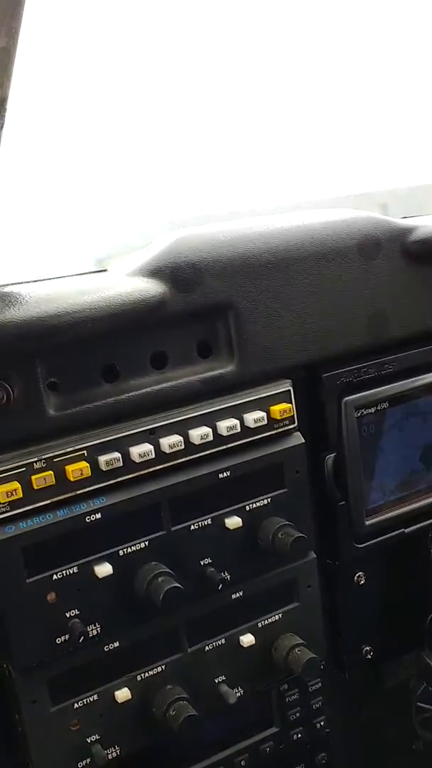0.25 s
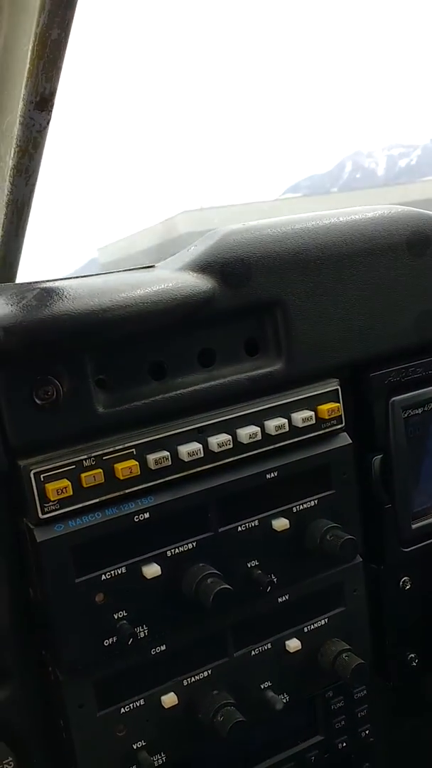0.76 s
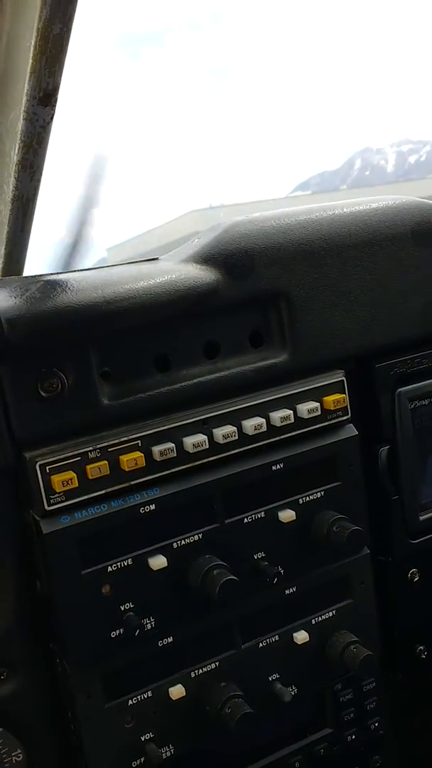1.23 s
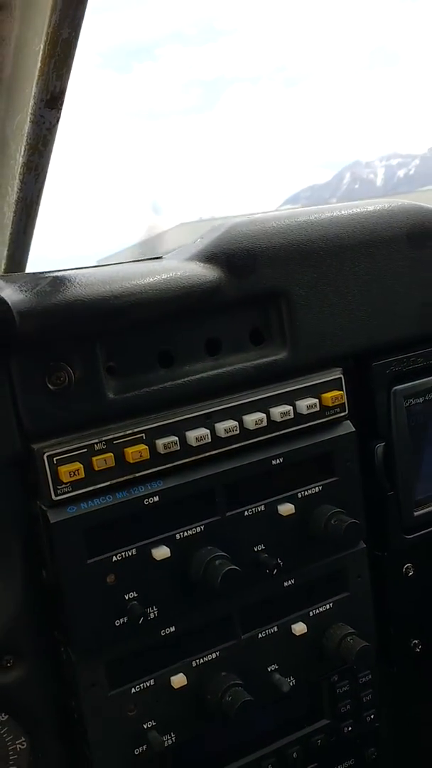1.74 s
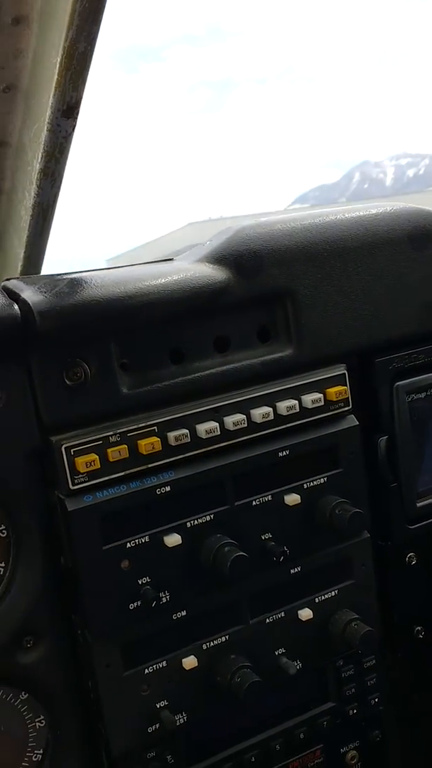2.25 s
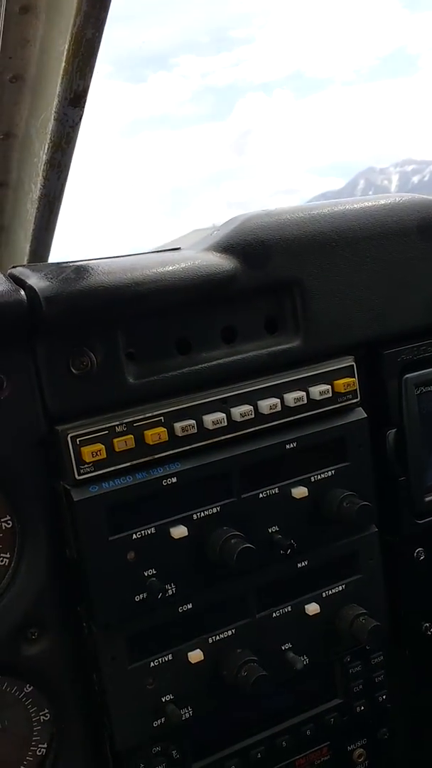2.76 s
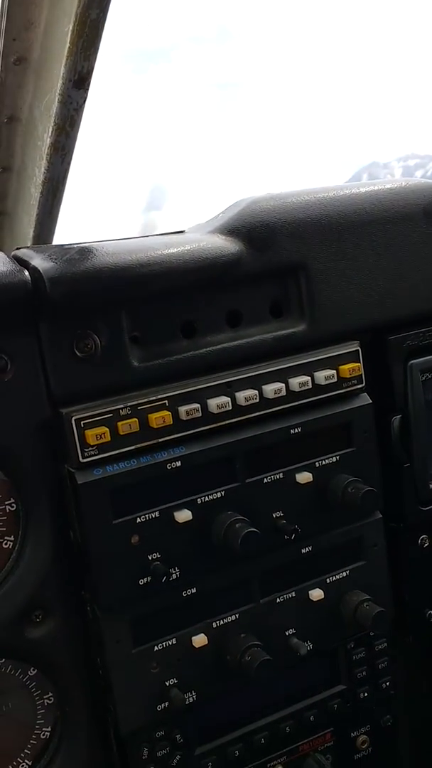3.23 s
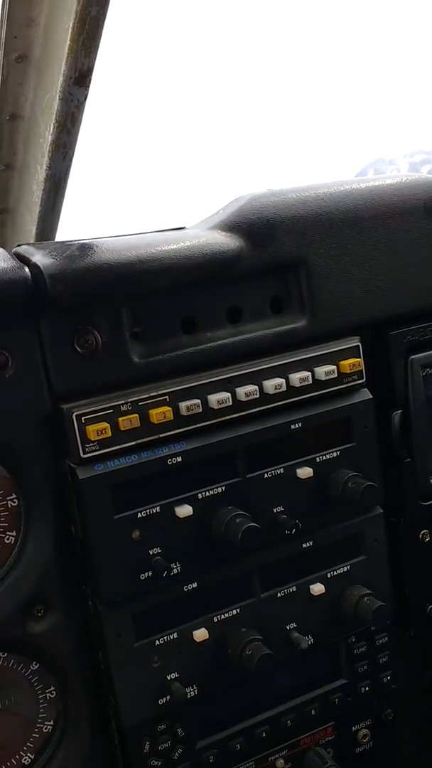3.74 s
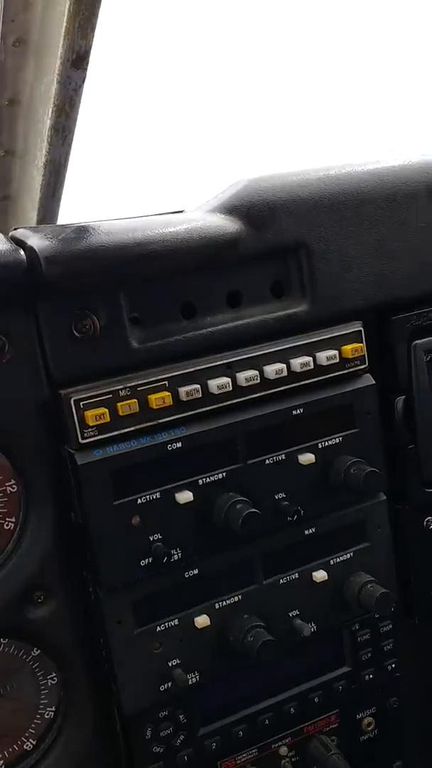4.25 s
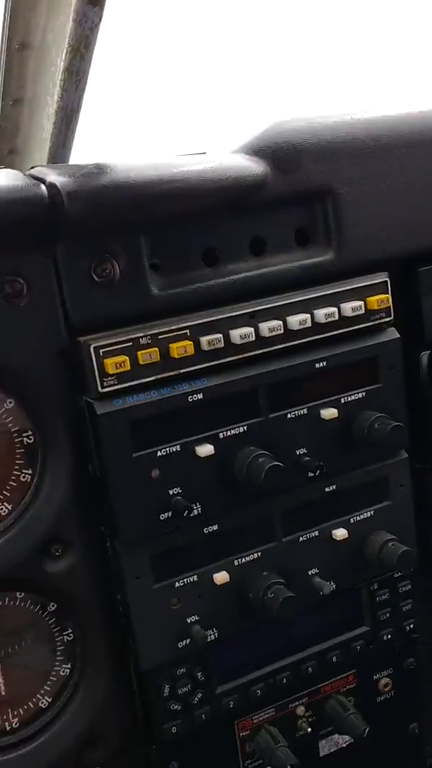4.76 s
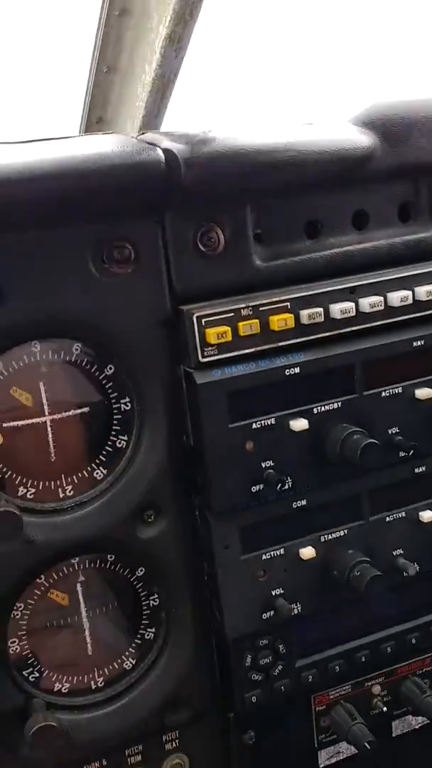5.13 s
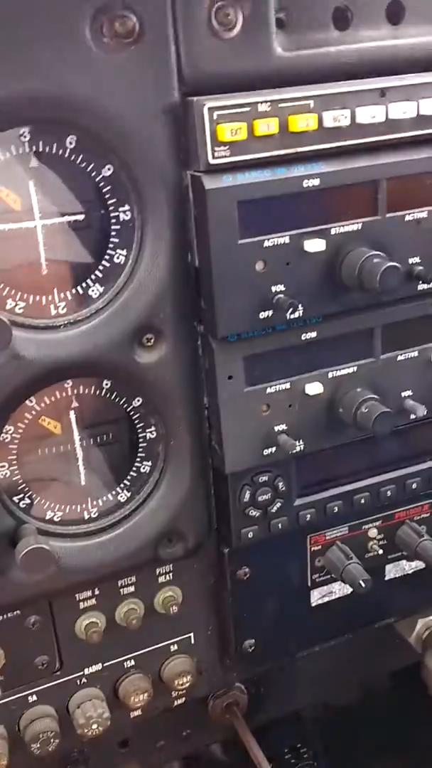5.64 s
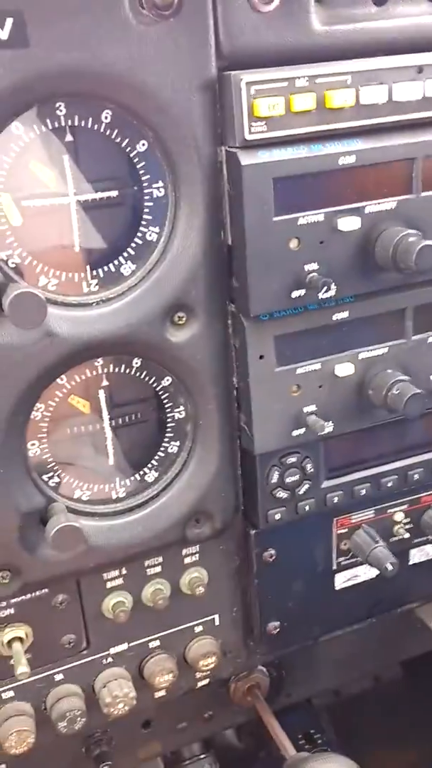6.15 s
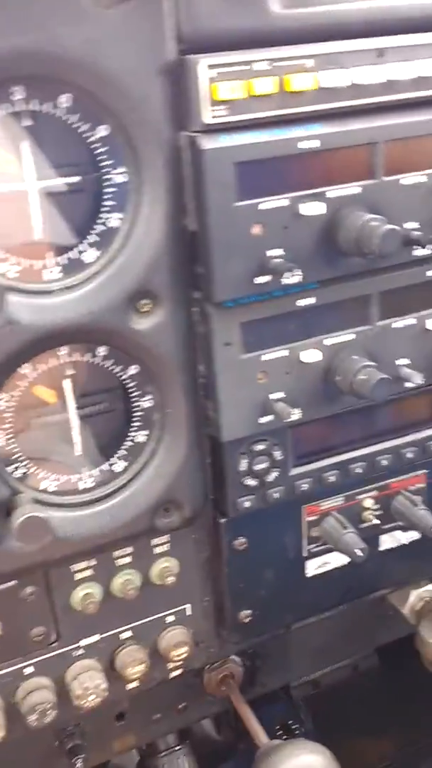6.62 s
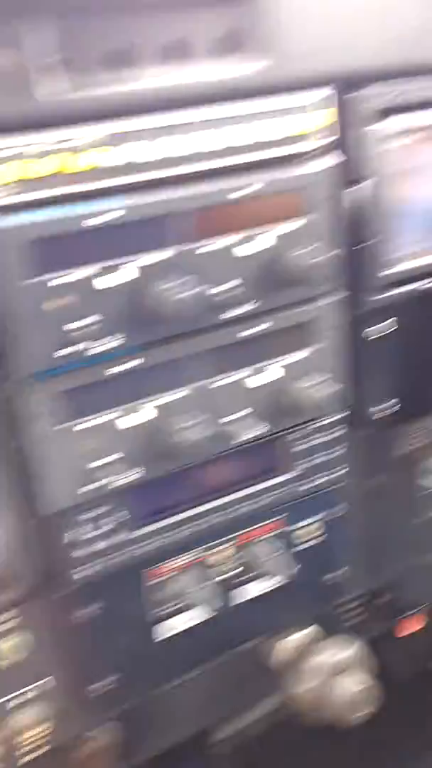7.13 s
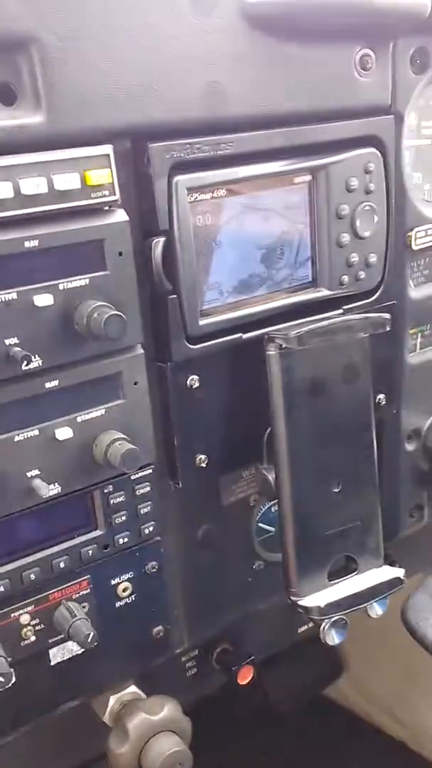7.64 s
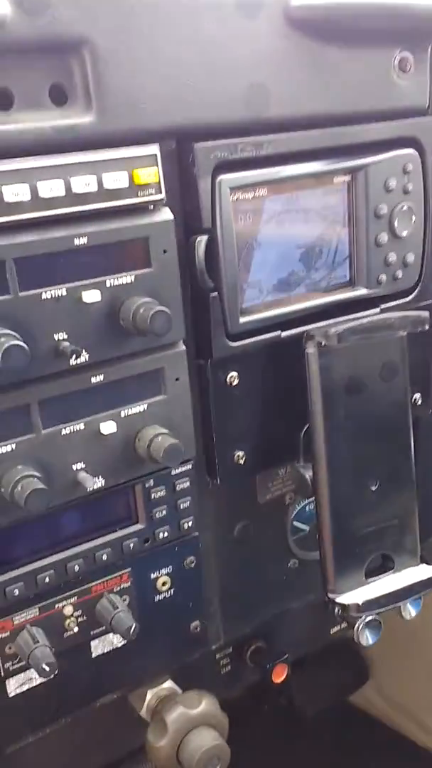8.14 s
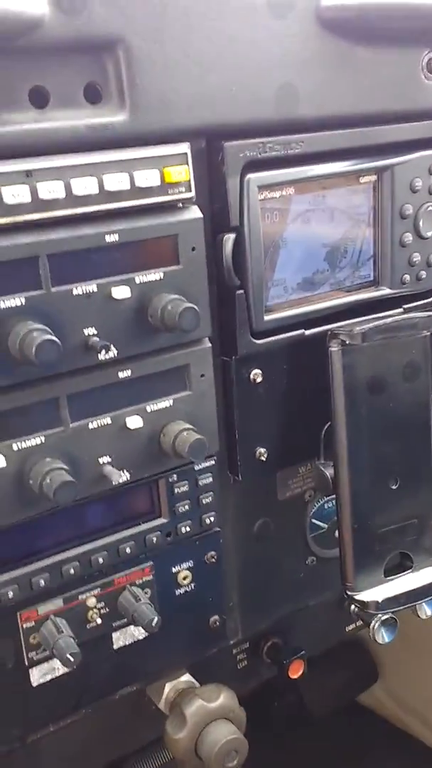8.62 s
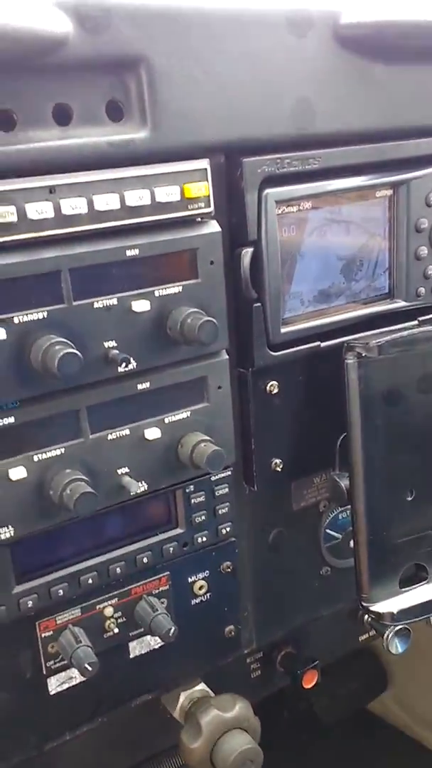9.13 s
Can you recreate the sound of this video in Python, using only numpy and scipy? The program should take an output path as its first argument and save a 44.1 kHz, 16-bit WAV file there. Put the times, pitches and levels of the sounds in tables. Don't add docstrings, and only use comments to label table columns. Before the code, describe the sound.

A piston propeller engine idles steadily, heard from inside a small cockpit. Low throbbing drone and broad air roar stay constant, while loose panels knock and rattle rapidly in the engine rhythm. A thin high gyro whine slowly climbs, joined by a faint fan tone later. A hand-held microphone moves about, adding light rubbing, dry ticks and scattered clicks, the sharpest about three quarters through.

```python
import sys
import numpy as np
from scipy import signal
from scipy.fft import rfft, irfft
from scipy.io import wavfile
from scipy.ndimage import uniform_filter1d

SR = 44100
rng = np.random.default_rng(int(sys.argv[2]) if len(sys.argv) > 2 else 0)


def gain_from_db(level_db):
    decades = np.asarray(level_db, float) / 20
    return 10 ** decades


def master_out(mix):
    frames = np.transpose(np.atleast_2d(mix))
    ceiling = np.clip(frames, -1, 1)
    pcm = np.round(ceiling * 32767).astype(np.int16)
    wavfile.write(sys.argv[1], SR, pcm)


N = 413658
COARSE = 6
WIDENER_LAG_S = .000562

# (t/s, lowered, leaning left)
PLACE = [(0, -7, 2), (.5, -5.5, -2.3), (.8, -7.5, -0.5), (1.4, -4.5, -3), (1.9, -3.5, -2), (2.5, -5, -4),
         (2.95, -4, 0.5), (3.25, -5, -0.5), (3.9, -4, 0.5), (4.6, 0, 0.5), (5.2, -1.5, 3), (5.65, 1, 4.5),
         (6.1, 2.5, 1), (6.5, 3, 2), (7, 2, 5.5), (7.5, 2, -1.5), (8.2, 2, 0), (9.38, 2.5, -0.5)]


def rms_one(x):
    return x / np.sqrt(np.mean(x ** 2) + 1e-20)


def in_time(rows, step=1):
    s, *columns = np.transpose(rows)
    return [np.interp(np.arange(0, N, step) / SR, s, c) for c in columns]


def at_hz(points, column=1):
    hz = np.arange(N // 2 + 1) * SR / N + 1
    points = np.array(points)
    return np.interp(np.log(hz), np.log(points[:, 0]), points[:, column])


def drift(rate, step=1):
    r = np.exp(-80 * np.pi * rate / SR)
    slow = signal.lfilter([1], [1, -2 * r, r * r], rng.standard_normal(N // 40 + 4002))[4000:]
    return np.interp(np.arange(0, N, step) / 40, np.arange(len(slow)), rms_one(slow - slow.mean()))


def resonate(x, hz, width_hz, step=1):
    r = np.exp(-np.pi * width_hz * step / SR)
    poles = [1, -2 * r * np.cos(2 * np.pi * hz * step / SR), r * r]
    return signal.lfilter([(1 - r * r) / 2, 0, (r * r - 1) / 2], poles, x + 1e-18)


def noise(spectrum):
    return irfft(rfft(rng.standard_normal(N)) * gain_from_db(at_hz(spectrum)) * np.sqrt(SR / 2), N)


def engine_cycles():
    # (t/s, cycle rate/Hz)
    speed = [(0, 10.40), (.4, 10.481), (.9, 10.408), (1.4, 10.422), (2, 10.411), (2.5, 10.382),
             (3.1, 10.417), (3.7, 10.336), (4.1, 10.343), (4.9, 10.289), (5.6, 10.28), (6.05, 10.24),
             (6.3, 10.319), (6.6, 10.242), (7.1, 10.366), (7.6, 10.237), (8.8, 10.248), (9.38, 10.36)]
    return .076 + np.cumsum(in_time(speed)[0]) / SR


def drone(cycles):
    # (multiple of cycle rate, left level/dB, right level/dB, right
    lines = [(3, -69, -68, 0.1), (4, -54, -54, 0.9), (6, -38.3, -35.5, 0.4), (7, -52, -54, 0.5),
             (8, -50, -51, 0.6), (9, -51, -52, -0.3), (10, -49, -53, 0.6), (12, -40, -34, 1.2),
             (13, -43, -39, 0.5), (14, -47, -45, 0.8), (15, -43, -42, 0.9), (16, -37, -37, 0.2),
             (18, -44, -40, -0.1), (20, -36.5, -32.5, -0.5), (22, -58, -47, 2.0), (23, -52, -52, -1.8),
             (24, -38, -42, -1.4), (26, -70, -50, -2.9), (28, -46, -40, -1.1), (30, -60, -47, 1.6),
             (32, -43, -50, -1.6), (36, -46, -50, 2.6),
             (11, -49, -49, 1), (38, -53, -46, 1.3), (40, -46, -48, -1), (44, -46, -49, -.6),
                    (48, -51, -46, -.8), (54, -47, -50, .3), (58, -47, -50, .5), (60, -44, -46, .5)]
    # (t/s, 0 long to 1 short)
    blade_path = [(0, 0), (.6, .2), (1.1, -.2), (1.6, 1), (2.3, 1.4), (2.9, .95), (3.4, 1.1), (3.9, -.2),
                  (4.6, .25), (5.6, -.4), (5.95, 1.1), (6.4, .8), (6.7, -.4), (7.25, -.7), (7.7, .9),
                  (8.5, 0), (9, .6), (9.38, .3)]
    windscreen_lines = [12, 28, 58, 60]
    cancel_db = {12: 10, 20: 6, 48: -9}
    reflected = [14, 28, 32, 48, 58]
    strong_firing, path_lead_cycles, far_lag_cycles = .22, .016, .0048
    odd_lead_rad, windscreen_db_per_step = 1, .9

    out = np.zeros((2, len(cycles)))
    path, = in_time(blade_path, COARSE)
    lowered, _ = in_time(PLACE, COARSE)
    for k, left_db, right_db, lead in lines:
        blade = k % 4 == 0 and 12 < k < 44
        lead_cycles = blade * path_lead_cycles * path - far_lag_cycles * (k > 30)
        angle = 2 * np.pi * k * (cycles - strong_firing + lead_cycles)
        angle += np.pi * (k not in reflected) + odd_lead_rad * (k % 2)
        angle += .007 * min(k, 24) * drift(1.5, COARSE)
        loss_db = (k in windscreen_lines) * windscreen_db_per_step * (lowered + 1)
        loss_db = loss_db + cancel_db.get(k, 0) * np.clip(path, 0, 1)
        waver = gain_from_db(1.9 + .6 * drift(1.8, COARSE) - loss_db)
        out[0] += gain_from_db(left_db) * waver * np.cos(angle - lead / 2)
        out[1] += gain_from_db(right_db) * waver * np.cos(angle + lead / 2)
    return signal.resample(out, N, axis=1)


def panels(cycles):
    # (share of the cycle, level/dB in each of four panel groups)
    contacts = [(0.02, 10, 1, 8, 0), (0.09, 10.5, 6.5, -8, 5.5), (0.17, 9, 5.5, -15, 14),
                (0.23, 3.0, -0.0, 9.5, -6), (0.28, -3, -4, -10, -3), (0.43, 8, 4.5, -5, -10.0),
                (0.5, 3.5, -4.5, -7.0, -2), (0.56, -0.5, 7, 2, 10), (0.62, 2.5, 3.5, 6.5, 0),
                (0.67, -5, 2, 1.5, 0.0), (0.73, -3, 9, 9, 8), (0.77, 3.0, 6.5, 13.5, -1),
                (0.86, -4, 9.5, 6, -8), (0.92, -20, 6, -9, -10)]
    low_left_db = [(6, -2, 6, -5), (2, 4, 2, 6), (1, 1.5, 1.0, 16), (3, 8, 8, -5), (1.5, 2.0, 4.5, 1.5),
                   (-1.0, -19, -11, -6), (2.5, -23, -10.0, 5), (7.0, 5, 11, 5), (0.5, 2, 4, -0.5),
                   (4, 4.5, 6.5, 12), (-5, 10, 6.5, 0.5), (0, 4, 12.5, 8), (-10.0, -9, -1.5, -5),
                   (5, -4, -18, -6)]
    low_right_db = [(-7, 2, 13, -3), (-9, 7, -5, 2), (11.5, 0, -9, 18), (-2, -14, 10, 6), (-2, 1, 4.0, 6),
                    (14, 14, -8.0, -16), (2, -7, 3, 2), (-3.5, -5.5, 6, 6.0), (4.5, 5.5, -7, 11),
                    (-5.5, -1, -2, 12), (-1, 1.5, 14, 5.0), (6, 8.5, 9.0, 5), (2, 7, 8.5, 3.0),
                    (-15, 5, -10.0, -8)]
    # (f/Hz, width/Hz, high level/dB, low left level/dB, low right level/dB)
    modes = [(354, 104, -8.5, -28, -2), (440, 24.6, -2, 5, 2), (501.5, 22, -5, 4.5, -6),
             (598.4, 23, 0, 8, 4), (625, 39, 0.5, 2, 4.5), (679, 34.5, -1, 5.5, 6.5), (784, 84, 1, 6, 3.5),
             (868, 73, 2.5, -2.5, -1), (935.5, 34, 5.5, 9, 6.5), (1044, 71, -50, -4.5, 0.5),
             (1123, 56, 0, -2, -40), (1140, 160, -16, -1, -14), (1223, 53.4, 2.5, 6, 2),
             (1405, 96, -3, 2.5, -3.5), (1457, 89, -3, 0, -2.5), (1550, 180, -23, -4, -8),
             (1790, 29, -2, 0, -8), (2060, 120, -17, -25, -35)]
    group_edges_hz = [730, 1100, 1300]
    pose_s = [
        2.0,
        5.6,
        7.0,
        7.5,
    ]
    # (t/s, level/dB)
    hard_knocks = [(1.886, 10), (2.753, 10), (3.118, 11), (3.909, 9), (4.523, 10), (5.465, 7.5),
                   (5.66, 8.5), (6.462, 5), (7.299, 9.5), (7.829, 12.5), (8.078, 10)]
    knock_db, shake_db, habit_db = -29, -2.5, 1.5
    uneven_db = 1.4

    share, *force_db = np.transpose(contacts)
    count, turns = len(share), int(cycles[-1] + 1)
    turn = np.arange(turns)
    due = turn[:, None] + share + .0004 * rng.standard_normal((turns, count))
    at = np.minimum(np.searchsorted(cycles, due.ravel()), len(cycles) - 1)
    turn_s = np.searchsorted(cycles, turn) * COARSE / SR
    blow_db = uneven_db * rng.standard_normal(at.shape)
    hard_s, hard_db = np.transpose(hard_knocks)
    hard_at = (hard_s * SR / COARSE).astype(int)
    coarse_s = np.arange(0, N, COARSE) / SR
    push = rng.choice([-1, 1], count)
    knock, shake = 0, 0
    for hz, width_hz, high_db, left_db, right_db in modes:
        push = -push
        heard_db = np.interp(coarse_s, pose_s, [high_db, left_db, left_db, right_db])
        heard = gain_from_db(heard_db) * np.sqrt(width_hz)
        group = np.searchsorted(group_edges_hz, hz)
        felt_db = [np.interp(turn_s, pose_s, [high, left[group], left[group], right[group]])
                   for high, left, right in zip(force_db[group], low_left_db, low_right_db)]
        habit = gain_from_db(np.transpose(felt_db) + habit_db * rng.standard_normal(count)) * push
        path_rad = rng.uniform(-.6, .6, count) + rng.normal(0, .008, count) * turn[:, None]
        habit = habit * np.cos(path_rad)
        hits = np.zeros(len(cycles))
        hits[at] = (habit * gain_from_db(1.5 * rng.standard_normal(due.shape))).ravel() * gain_from_db(blow_db)
        hits[hard_at] = push[0] * gain_from_db(hard_db)
        hits = np.roll(hits, rng.integers(0, 5))
        wash = rng.standard_normal(len(cycles))
        ring = resonate(hits, hz, width_hz, COARSE)
        knock = knock + heard * rms_one(resonate(ring, hz, 3.25 * width_hz, COARSE))
        sway = resonate(wash, hz, 1.3 * width_hz, COARSE)
        shake = shake + heard * rms_one(resonate(sway, hz, 3.1 * width_hz, COARSE))
    knock = gain_from_db(knock_db) * signal.resample(rms_one(knock), N)
    shake = gain_from_db(knock_db + shake_db) * signal.resample(rms_one(shake), N)
    return knock, shake


def airframe(cycles):
    # (f/Hz, level/dB per Hz)
    roar_spectrum = [(25, -79), (42, -69), (66, -62.5), (105, -59), (140, -52), (220, -61.5), (330, -57.5),
                     (1000, -63.5), (1640, -70.5), (2200, -69), (2600, -79), (3700, -80.5), (5600, -87),
                     (6500, -98.5)]
    # (f/Hz, level/dB per Hz)
    hiss_spectrum = [(1500, -100), (5000, -92), (7500, -98), (8500, -100.5), (12000, -109.5), (15500, -100)]
    draught_db_per_step = 0.43

    knock, shake = panels(cycles[::COARSE])
    shaft_db = 0.13 * np.cos(4 * np.pi * (cycles - .2))
    blade_db = 0.31 * np.cos(8 * np.pi * (cycles - .1))
    throb = gain_from_db(shaft_db + blade_db + 0.96 * drift(9.3))
    roar = noise(roar_spectrum)
    _, left = in_time(PLACE)
    upper = signal.sosfilt(signal.butter(2, 2500, "high", fs=SR, output="sos"), roar)
    roar += (gain_from_db(draught_db_per_step * (left - left.mean())) - 1) * upper
    return knock + throb * (shake + roar) + noise(hiss_spectrum) * gain_from_db(2.0 * drift(30))


def gyro():
    # (t/s, level/dB)
    heard_db = [(0, -66), (1.8, -67), (2.2, -61), (3.1, -66), (3.8, -58), (4.6, -60), (5.45, -67),
                (5.6, -57), (6.6, -52), (7.1, -59), (7.8, -56), (8.6, -62), (9.38, -61)]
    # (t/s, peak level/dB)
    fan_faced = [
        (5.2, -55),
        (7.2, -58),
        (7.9, -57),
    ]
    start_hz, gain_hz_per_s, slowing_hz_per_s2 = 3289, 60, .27
    octave_from_s, octave_start_db, octave_gain_db_per_s = 5.1, -72, 1.5
    fan_hz, fan_fade_db_per_s, fan_away_db = 4269, 15, -79

    t = np.arange(N) / SR
    hz = start_hz + gain_hz_per_s * t - slowing_hz_per_s2 * t ** 2
    angle = 2 * np.pi * np.cumsum(hz + 1.5 * drift(25)) / SR
    whine = gain_from_db(in_time(heard_db)[0] + 3 + 1.8 * drift(5)) * np.sin(angle)
    octave_db = octave_start_db + octave_gain_db_per_s * (t - octave_from_s) - 2 * (t < octave_from_s)
    octave = gain_from_db(octave_db + 3 + 2.2 * drift(5)) * np.sin(2 * angle)
    fan_db = np.max([db - fan_fade_db_per_s * abs(t - s) for s, db in fan_faced], axis=0)
    fan_angle = 2 * np.pi * np.cumsum(fan_hz + 1.0 * drift(9.1)) / SR
    fan = gain_from_db(np.maximum(fan_db, fan_away_db) + 2.4 * drift(4)) * np.sin(fan_angle)
    return whine + octave + fan


def hand():
    # (start t/s, length/s, level/dB)
    rubs = [(0.398, 0.28, -58), (0.848, 0.042, -56), (0.936, 0.081, -53), (1.397, 0.12, -62),
            (1.82, 0.042, -59), (2.113, 0.036, -59), (2.303, 0.035, -54), (2.43, 0.13, -58),
            (2.72, 0.11, -62), (3.704, 0.056, -62), (3.809, 0.064, -67), (3.95, 0.065, -58),
            (4.162, 0.048, -59), (4.877, 0.079, -57), (5.39, 0.045, -56), (5.605, 0.29, -58),
            (5.901, 0.085, -51), (6.07, 0.11, -51), (6.42, 0.1, -56), (6.748, 0.14, -54),
            (6.929, 0.073, -63), (7.282, 0.29, -64), (7.657, 0.11, -59), (7.758, 0.094, -52),
            (7.98, 0.11, -59), (8.297, 0.076, -55), (8.474, 0.067, -48), (8.564, 0.17, -52.5),
            (9.167, 0.075, -62), (9.28, 0.084, -60)]
    # (t/s, peak level/dB, ring f/Hz)
    clicks = [(0.471, -26, 4220), (0.5595, -32, 7660), (0.6243, -33, 4140), (0.941, -24.5, 3170),
              (1.322, -51, 4240), (3.4261, -40, 4310), (3.8505, -27, 3300), (3.983, -28, 4500),
              (4.3994, -38, 4100), (4.8244, -41, 4200), (6.2456, -31, 3920), (6.282, -44, 4400),
              (7.172, -17, 6200), (7.1775, -22, 4720), (7.1825, -32, 3600)]
    grip_db, rub_edge_s = -57.5, 0.036
    grains_per_s, slips_per_s = 1200, 60
    slip_hz, slip_width_hz, slip_db = 7350, 350, -8

    t = np.arange(N) / SR
    pressure = gain_from_db(grip_db)
    for s, length, db in rubs:
        inside_s = np.minimum(t - s, s + length - t)
        pressure = pressure + gain_from_db(db) * np.clip(inside_s / rub_edge_s + .5, 0, 1)
    grain_size = gain_from_db(2.8 * np.minimum(rng.exponential(1, N), 5)) * rng.choice([-1, 1], N)
    grains = (rng.random(N) < grains_per_s / SR) * grain_size
    rub = 1.2 * resonate(grains, 5700, 507) + 0.77 * resonate(grains, 7600, 7000)
    rub += 2.0 * resonate(grains, 5400, 620)
    slips = (rng.random(N) < slips_per_s / SR) * gain_from_db(2 * rng.standard_normal(N))
    slip_ring = rms_one(resonate(slips, slip_hz, slip_width_hz))
    out = pressure * (rms_one(rub) + gain_from_db(slip_db) * slip_ring)
    for s, peak_db, hz in clicks:
        strike = 0.064 * rng.standard_normal(441) * np.exp(-np.arange(441) / 130)
        strike[0] = 1
        click = resonate(strike, hz, 920) + 0.054 * resonate(strike, 10000, 9000)
        click += 0.48 * resonate(strike, 3400, 2000)
        start = round((s + 0.0013) * SR)
        out[start:start + 441] += gain_from_db(peak_db + 3.5) * click / np.abs(click).max()
    return out


def ticks():
    # (t/s, peak level/dB)
    snaps = [(0.5606, -38), (0.8694, -43), (0.9408, -36), (1.9734, -41), (2.1186, -44), (2.4573, -45),
             (3.8506, -46), (5.4046, -46), (6.765, -41), (6.7974, -43), (6.8399, -46), (6.8623, -45),
             (7.1716, -41), (7.7338, -36), (8.0287, -42), (8.5265, -43), (8.6697, -47), (0.6444, -46),
             (1.4486, -43), (4.9182, -46), (7.1755, -43), (7.6106, -39), (7.6894, -44), (8.4781, -39),
             (8.5689, -42), (8.776, -47)]
    out = np.zeros(N + 88)
    for s, peak_db in snaps:
        snap = rng.standard_normal(88) * np.exp(-np.arange(88) / 25)
        out[round(s * SR):][:88] += gain_from_db(peak_db + 7.0) * np.diff(snap, prepend=0) / 2
    return out[:N]


def widen(shared, own):
    # (f/Hz, likeness 0-1, left minus right/dB)
    width = [(60, 0.5, 3), (150, 0.72, 1.5), (240, 0.25, -0.5), (375, 0.18, 2), (470, 0.72, 0),
             (637, 0.65, 1.5), (620, 0.97, 5), (760, 1, -1.5), (1140, 1, 1.5), (1520, 0.67, -5),
             (1770, 1, 0), (3000, 0.7, 0)]
    low_lead_rad = .5

    alike = np.clip(at_hz(width), 0, 1)
    balance_db = at_hz(width, column=2)
    alike = np.maximum(alike, at_hz([(1800, 0), (2600, 1)])) * at_hz([(2600, .95), (5000, .9), (9000, .7)])
    hz = np.arange(N // 2 + 1) * SR / N
    lead = np.maximum(low_lead_rad, 2 * np.pi * hz * WIDENER_LAG_S - np.pi)
    a = np.sqrt((1 + alike) / 2) * rfft(shared)
    b = np.sqrt((1 - alike) / 2) * rfft(own)
    left = (a + b) * gain_from_db(balance_db / 2)
    right = (a - b) * gain_from_db(-balance_db / 2) * np.exp(1j * lead)
    return irfft([left, right], N)


def standing_waves(x):
    edges_hz = [100, 145, 187, 228, 270, 310, 350, 470, 540, 700, 1000, 1300, 1600]
    # (level/dB per step lowered, level/dB per step left)
    slopes = [(-0.2, 0.22), (-0.49, 0.73), (-0.3, 0.94), (-0.28, -0.031), (0.11, -0.36), (0.053, 0.52),
              (0.098, 0.15), (-0.22, -0.59), (-0.58, -0.18), (-0.11, -0.11), (0.044, 0.095), (-0.64, -0.7)]

    lowered, left = in_time(PLACE, COARSE)
    spectrum, change = rfft(x) / COARSE, 0
    for low, high, (down_db, left_db) in zip(edges_hz, edges_hz[1:], slopes):
        mask = at_hz([(low / 1.04, 0), (low * 1.04, 1), (high / 1.04, 1), (high * 1.04, 0)])
        level_db = down_db * (lowered - lowered.mean()) + left_db * (left - left.mean())
        change = change + (gain_from_db(level_db) - 1) * irfft(spectrum * mask, N // COARSE)
    return x + signal.resample(change, N, axis=1)


def holes(x):
    top_band_hz, hole_share, hole_chance, hole_wider = 15250, .026, .9, 1.8

    def band(spectrum, low, high):
        return irfft(spectrum * at_hz([(low, 0), (low + 20, 1), (high, 1), (high + 20, 0)]), N)

    def gate(threshold):
        blocks = drift(22, 512).repeat(512)[:N]
        return uniform_filter1d(1. * (blocks < threshold), 300)

    out = x - gate(-.4) * band(rfft(x), top_band_hz, 16500)
    middle = rfft(x.mean(0))
    for k in range(2, 9):
        hz = k / WIDENER_LAG_S
        low, high = hz * (1 - hole_share), hz * (1 + hole_share)
        dropped = gate(hole_chance - .5 * (k == 2))
        out = out - dropped * band(middle, low, high)
        if k in (4, 5):
            out = out - dropped * gate(.2) * band(middle, high + 20, hz * (1 + hole_wider * hole_share))
    return out


def scene():
    cycles = engine_cycles()
    wide = widen(airframe(cycles) + gyro() + hand() + ticks(), airframe(cycles))
    return standing_waves(wide + drone(cycles[::COARSE]))


def top_cut(x):
    return signal.sosfilt(signal.butter(12, 15560, fs=SR, output="sos"), x)


def record(dry):
    # (t/s, half length/s, loss/dB)
    level_dips = [
        (0, .25, 3),
        (3.2, .14, 2.4),
        (6.55, .15, 1.5),
        (7.15, .15, 1.2),
    ]
    # (f/Hz, level/dB)
    response = [(12500, 0), (14200, -2.5), (15100, -2), (15300, -6), (15600, -12)]

    t = np.arange(N) / SR
    loss_db = sum(db * np.clip(1 - abs(t - s) / half, 0, 1) for s, half, db in level_dips)
    heard = irfft(rfft(dry * gain_from_db(-loss_db)) * gain_from_db(at_hz(response)), N)
    return top_cut(holes(heard))


dry = scene()
out = record(dry)
master_out(out)
```